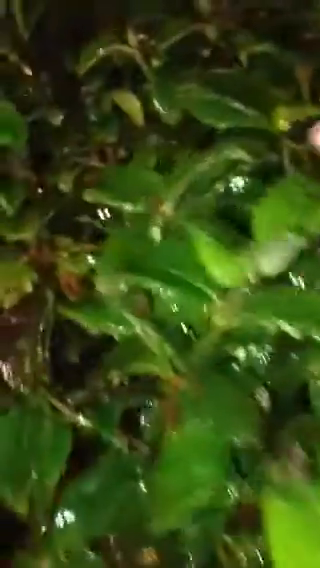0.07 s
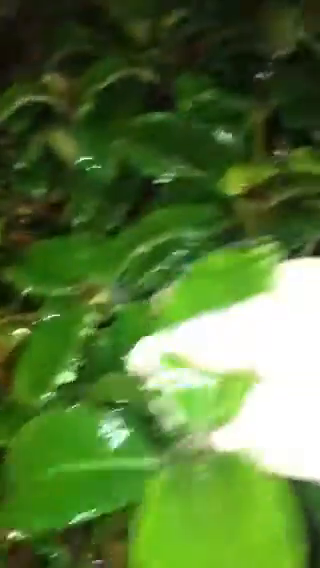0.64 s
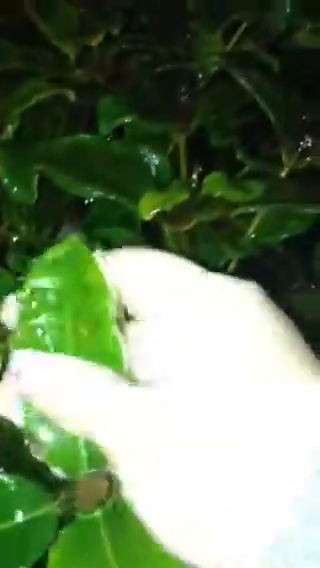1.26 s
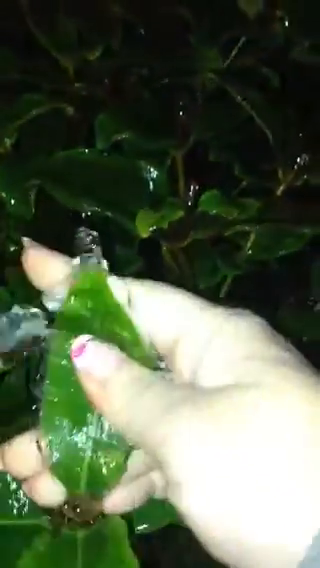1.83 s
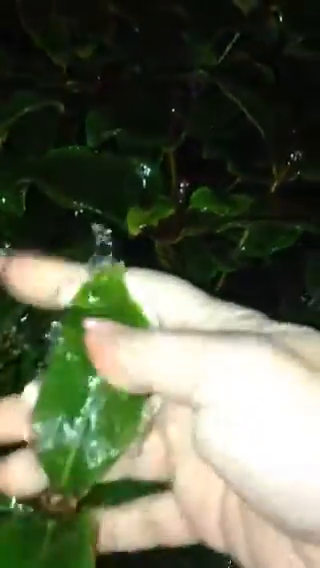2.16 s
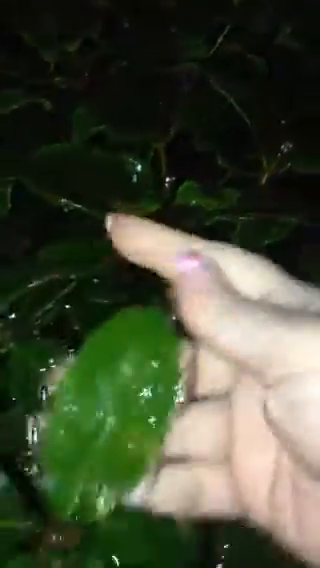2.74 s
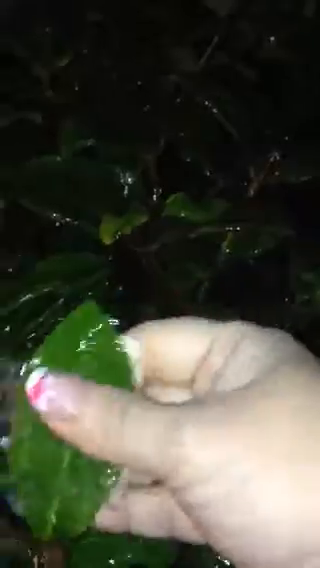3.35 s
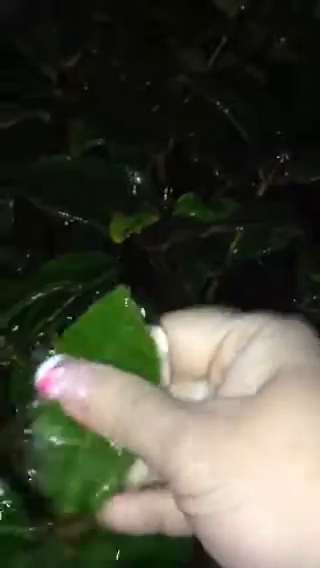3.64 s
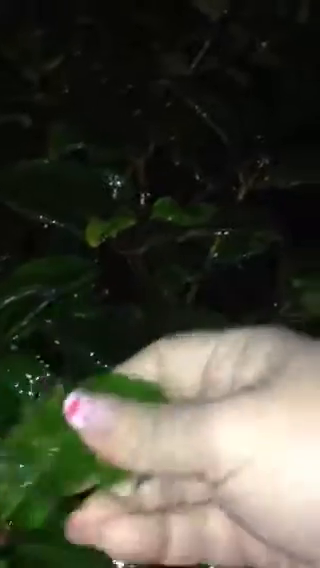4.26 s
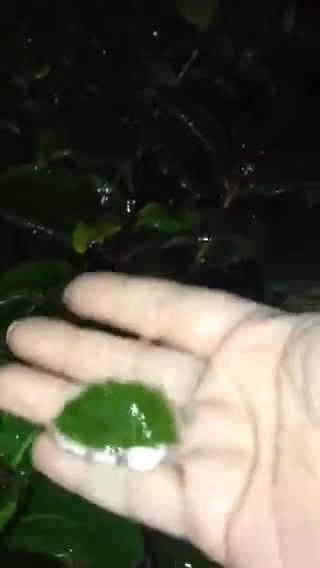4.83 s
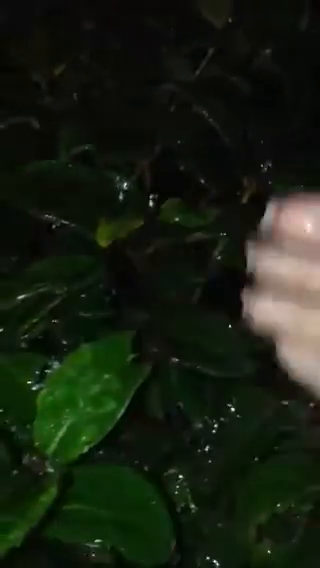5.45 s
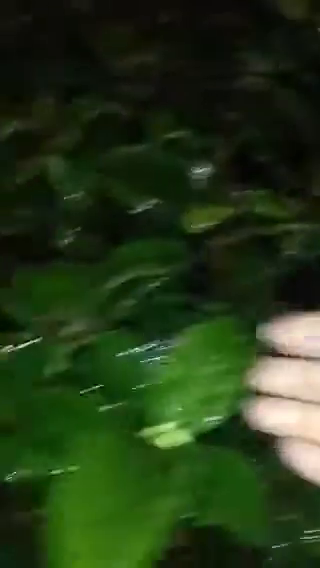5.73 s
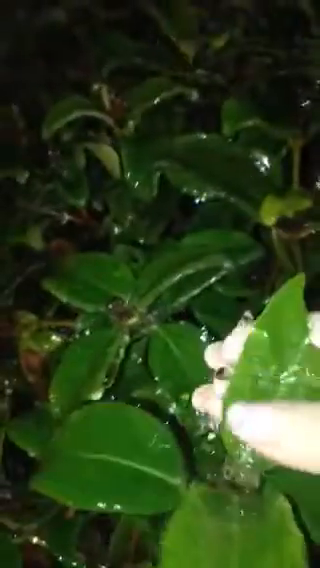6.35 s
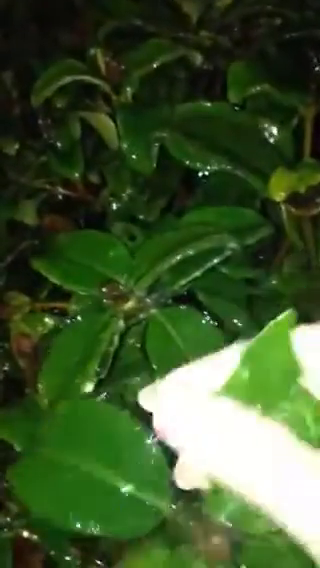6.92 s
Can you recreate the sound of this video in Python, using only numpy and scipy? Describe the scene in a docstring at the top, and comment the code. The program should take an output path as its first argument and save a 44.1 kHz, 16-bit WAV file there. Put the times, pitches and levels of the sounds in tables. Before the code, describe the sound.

Outdoors at a bush at night, a hand bends ice-coated leaves close to the microphone. The glaze snaps in tiny, sharp cracks throughout, crumbling and scraping as it slides over a leaf. Just overhead, water drips evenly on an umbrella with a few heavier drops, and about halfway a patter of small drops joins in. Brief gusts rumble on the microphone near the start and around the middle.

```python
"""Ice on leaves at night

Outdoors at a bush, phone microphone close in. A hand bends ice-coated leaves and slides the shell off
one: the glaze snaps in tiny ringing cracks, crumbles and scrapes over the leaf. Just overhead, drops
tap on taut umbrella fabric, singly and then in a patter. A few gusts buffet the microphone."""
import sys
import numpy as np
from scipy import signal
from scipy.fft import rfft, irfft
from scipy.io import wavfile
from scipy.ndimage import uniform_filter1d

SR = 44100
rng = np.random.default_rng(int(sys.argv[2]) if len(sys.argv) > 2 else 0)


def generate_wav(signal):
    """Clip the signal to [-1, 1] and save it as 16-bit WAV at the path in sys.argv[1]."""
    frames = np.transpose(np.atleast_2d(signal))
    scaled = np.clip(frames, -1, 1) * 32767
    pcm = np.round(scaled).astype(np.int16)
    wavfile.write(sys.argv[1], SR, pcm)


N = 312757
TIME = np.arange(N) / SR
TOP_HZ = 15500
BANDS_HZ = np.geomspace(200, 16000, 40)

# snaps of the glaze, close in: (time [s], level over 1 ms [dB], centre [Hz], spread [octaves],
# delay of a second snap or 0 for none [s], force of the crumbling around it [dB])
CRACKS = [(0.103, -31.5, 3870, 0.48, 0.0019, -55), (0.1724, -16, 6560, 0.22, 0, -37),
          (0.249, -15, 6030, .63, 0, -60), (0.6094, -30.5, 6940, 0.5, 0.0012, -55),
          (0.653, -24, 6300, .5, 0.018, -43), (0.7496, -27.5, 5180, 0.84, 0.007, -62),
          (1.1424, -16.5, 7120, 0.63, 0.0017, -42), (1.1995, -26, 7000, .54, 0.0086, -45),
          (1.274, -25, 7200, 0.52, 0.003, -54), (1.2822, -18, 6760, 0.71, 0.0036, -49),
          (1.3127, -17.5, 6300, 0.9, 0, -63), (1.5388, -19, 7800, 1.13, 0, -43),
          (1.7836, -23.5, 9040, 0.51, .0144, -49), (1.8783, -23, 8200, 0.53, 0.0081, -60),
          (1.893, -23.5, 7600, 0.58, 0, -63), (1.941, -27.5, 7140, 0.23, 0, -70),
          (2.029, -23, 6800, 0.81, 0.0056, -52), (2.095, -21, 7250, 0.26, 0.0021, -31),
          (2.243, -20, 4000, 0.7, 0, -51), (2.2542, -22, 5360, 0.49, 0.0011, -40.5),
          (2.3867, -28, 5560, 0.55, 0.0053, -41), (2.53, -22, 8200, 0.43, 0.0044, -36),
          (2.613, -29, 5570, 1.14, 0.0015, -47), (2.66, -24.5, 7000, 1.08, 0.0011, -34),
          (2.696, -26, 4470, 0.88, 0.003, -41), (2.739, -20, 3860, 0.65, .004, -44),
          (2.848, -22, 4250, 0.69, 0.0026, -47), (2.889, -20, 6400, 1.17, 0.0047, -34),
          (2.9072, -23, 5760, .2, 0.0005, -66), (2.9493, -29, 7240, 0.79, 0.004, -52),
          (2.9887, -26.5, 4120, 0.46, 0.014, -43), (3.0896, -24.5, 4760, 0.74, 0.018, -52),
          (3.131, -22, 5600, 1, 0.0067, -34), (3.2303, -25.5, 2900, 1, 0.0028, -36),
          (3.3183, -15.5, 9240, 0.25, 0.0077, -37), (3.4964, -24.5, 3200, 1, 0.0042, -49),
          (3.7738, -21.5, 6000, 0.24, 0.0026, -52), (3.892, -27.5, 7260, 0.57, 0.0041, -37.5),
          (3.945, -27, 3930, 0.23, 0.00082, -60), (3.96, -26.5, 7260, 0.82, .021, -44),
          (4.064, -23, 6050, 0.64, 0.00061, -33), (4.0992, -14.5, 3930, 0.7, 0.014, -59),
          (4.1178, -23, 3220, 0.32, 0.0073, -42.5), (4.1339, -22.5, 4250, .7, 0, -35.5),
          (4.203, -25.5, 3400, 0.38, 0, -52), (4.246, -29.5, 9100, 0.67, .006, -57),
          (4.4044, -21.5, 2480, 0.53, 0.0056, -58), (4.4085, -22.5, 7520, 0.66, .007, -36),
          (4.486, -32, 6800, .65, 0.0051, -47), (4.61, -25, 6950, 1.06, 0.0014, -34),
          (4.7589, -31, 7700, 0.42, 0.005, -54), (4.863, -26, 5000, 0.88, .005, -53),
          (5.092, -26.5, 10800, 0.32, 0.00097, -46.5), (5.2095, -31, 10700, 0.15, 0.0011, -45.5),
          (5.282, -23.5, 5440, 0.77, 0.0014, -37), (5.3619, -11, 5860, 0.43, 0, -50),
          (5.3698, -15.5, 6100, 0.49, 0, -57), (5.382, -19, 6300, 0.77, 0.004, -58),
          (5.479, -22, 6600, 0.75, 0, -58), (5.5764, -24, 2100, 0.34, 0, -58),
          (5.6076, -19, 4550, .7, 0.00057, -55), (5.7341, -13, 3430, 0.72, 0.0088, -36),
          (5.7783, -21.5, 3200, 0.7, 0.0046, -54), (5.818, -26.5, 4530, 0.94, 0.0033, -64),
          (5.896, -32.5, 4530, 0.95, 0.0033, -48), (6.0705, -27.5, 3260, 0.66, 0.0055, -53),
          (6.13, -21.5, 6780, 1.04, 0.0002, -37), (6.5009, -19, 7240, 0.63, 0.0034, -45),
          (6.8467, -16, 7140, 0.5, 0.003, -36.5), (7.0478, -23, 9500, 0.5, 0.0065, -47)]
# shiver of the stiff leaf after a snap: (frequency [Hz], relative density [dB])
LEAF_SPECTRUM = [(500, -33), (1400, 2.5), (2200, -10), (2900, 11), (3800, 6.5), (4700, 12), (6200, -36),
                 (8500, 15.5), (15000, -16.5)]
# fingers push ice along the leaf:
# (time [s], length [s], force [dB], fade over the length [dB], force of crunch relative to fizz [dB])
STROKES = [(0.164, 0.15, -32, 18, -19), (1.31, 0.17, -40, 8.5, -35), (1.504, 0.1, -40.5, -0.5, -7),
           (1.708, 0.046, -48.5, -4, -17), (1.765, 0.058, -35, 21, -9), (1.86, 0.17, -54, -11, -36),
           (1.993, 0.13, -41.5, -2.5, -18), (2.136, 0.077, -47.5, -6.5, -17), (2.73, 0.081, -41.5, 8, -1),
           (3.068, 0.053, -38.5, 30, 7), (3.308, 0.023, -43, -6.5, -7.5), (3.423, 0.029, -57.5, 12, 18),
           (3.663, 0.066, -32.5, 35, -24), (3.734, 0.069, -49.5, -5.5, -28), (3.934, 0.063, -54, -14, -9),
           (4.224, 0.13, -40.5, 8, -17), (4.359, 0.17, -39, 12.5, -3.5), (5.01, 0.075, -51, 14, 2),
           (5.8, 0.064, -40.5, 23, 5), (6.199, 0.15, -44.5, 9, -20), (6.584, 0.067, -44, 4, -17),
           (6.851, 0.092, -51, -2, -23), (6.999, 0.04, -33.5, 28, -27)]
# ice sliding on the leaf: (frequency [Hz], relative density [dB])
SLIDE_SPECTRUM = [(1200, -28), (2500, -4), (4000, 4), (6000, 3), (9000, 2), (12000, 1.5), (15500, -5)]
# loose crumbs and rustling leaves: (time [s], level [dB])
RUSTLE = [(0, -59), (.5, -51.5), (.9, -64.5), (1.3, -58), (1.85, -59), (2.2, -64), (2.5, -55.5), (2.7, -46),
          (3.5, -52.5), (4.3, -46.5), (4.8, -57.5), (5.6, -58), (6.15, -50), (6.7, -55), (7.09, -51.5)]

# modes of the fabric overhead: (frequency [Hz], t60 [s], relative level [dB])
FABRIC_MODES = [(217, 0.095, -27), (306, 0.056, -6.5), (359.6, 0.053, 2.5), (424, 0.082, -9),
                (521, 0.022, 1.5), (648, 0.044, -1), (786, 0.022, -3.5), (976, 0.015, -2),
                (1140, 0.065, -26)]
# the fabric booms more as the phone moves under it: (time [s], gain of its deep modes [dB])
FABRIC_BOOM = [(0, 2.5), (3.3, -14), (4.2, 2.5), (5.5, 5), (6.0, 53), (7.09, 43)]
# a drop's slap on the fabric: (frequency [Hz], relative density [dB])
SLAP_SPECTRUM = [(300, -11.5), (700, 2), (1200, 0.5), (1900, -1), (2900, -3), (5000, -12), (12000, -20.5)]
# the steady drip's slightly wavering pace: (time [s], gap between drops [s])
DRIP_PACE = [(0, .2242), (1.5, .2242), (1.7, .221), (3.2, .221), (3.5, .228), (4.9, .216), (5.4, .228),
             (7, .222)]
# size of the drip's drops: (time [s], ring level over 10 ms [dB])
DRIP_SIZE = [(0, -39.5), (.6, -36), (1.3, -40.5), (1.9, -42), (2.12, -37.5), (2.33, -46), (2.56, -37),
             (7.09, -42)]
# stray heavy drops: (time [s], relative level [dB], slap relative to the fabric's ring [dB])
HEAVY_DROPS = [(0.188, -40.5, -4), (0.391, -37.5, -4), (0.464, -43.5, -3), (0.504, -37.5, -8.5),
               (0.532, -41, -7), (0.645, -44, -4.5), (1.956, -43, 2.5), (2.488, -46, -7),
               (2.726, -41.5, -10), (2.816, -39, -8), (3.152, -39, -12), (3.27, -36, -1),
               (3.388, -37.5, -13), (3.587, -38.5, -7), (3.73, -36, -5), (4.211, -35, -8), (4.389, -34, -8),
               (4.637, -36, -9), (5.429, -46, -12), (6.01, -34.5, -4.5), (6.211, -37, -6),
               (6.25, -33.5, -1.5), (6.437, -35.5, -9), (6.674, -35, -32)]
# the patter of small drops swells halfway: (time [s], relative level [dB])
PATTER = [(0, -59), (0.6, -54), (1.0, -66), (2.3, -61.5), (3.3, -48.5), (4.0, -45.5), (6.0, -44),
          (7.09, -45.5)]

# gusts on the microphone: (time [s], length [s], relative level [dB])
GUSTS = [(0.157, 0.13, -46), (0.53, 0.068, -36.5), (0.637, 0.054, -33), (1.056, 0.09, -52.5),
         (2.801, 0.19, -38), (3.148, 0.24, -39)]
# eddies at the microphone port: (frequency [Hz], relative density [dB])
EDDY_SPECTRUM = [(20, -36), (45, -3), (70, 6.5), (130, 3), (200, -7.5), (350, -37), (800, -26), (3000, -47)]
# hollow knocks within a gust: (frequency [Hz], relative density [dB])
BUFFET_SPECTRUM = [(100, -12), (220, 3.5), (330, 1), (500, -8.5), (1000, -27), (3000, -78)]
# night air, far off: (frequency [Hz], relative density [dB])
NIGHT_SPECTRUM = [(20, -43), (60, 5.5), (110, -5), (200, -3.5), (400, -3), (700, -4), (1500, -10.5),
                  (4000, -9.5), (15000, -16.5)]
# faint distant hum: (frequency [Hz], peak level [dB])
HUM = [(216.6, -67), (109, -73.5)]


def snap(hz, octaves, fall_s=0.00084, ring_s=0.0019, ring_db=-4, leaf_s=0.0032, leaf_db=-12):
    """One fracture: a burst that dies in a millisecond, a ringing flake of ice and the leaf's shiver."""
    t = TIME[:1200]
    noise = rng.standard_normal((2, len(t)))
    bell = np.exp(-(np.log2(BANDS_HZ / hz) / octaves) ** 2 / 2) * hz / BANDS_HZ
    sizzle = undb(-32) ** 2 * (1 + (BANDS_HZ / 3500) ** 2)
    # the fracture runs at full strength for a moment before it dies
    burst = np.tanh(2 * noise[0]) * np.exp(-(t / fall_s) ** 2 / 2)
    crack = colour(burst, rippled(10 * np.log10(bell + sizzle)), size=512)
    # the flake's strongest mode lies at the centre, weaker ones scatter around it
    order = np.arange(3)[:, None]
    offsets = octaves * np.sign(order) * rng.uniform(-0.95, 1, (3, 1))
    modes_hz = np.minimum(hz * 2 ** offsets, TOP_HZ)
    ring = (np.sin(2 * np.pi * modes_hz * t) / np.sqrt(1 + order)).sum(0) * np.exp(-t / ring_s)
    leaf = colour(noise[1] * np.exp(-t / leaf_s), rippled(outline(LEAF_SPECTRUM)), size=512)
    return packed(unit(crack) + undb(ring_db) * unit(ring) + undb(leaf_db) * unit(leaf), seconds=0.001)


def ice_cracks(second_db=-1.5):
    """Close to the microphone the glaze breaks as the leaf bends; often the fracture jumps once more."""
    out = np.zeros(N)
    for s, db, hz, octaves, delay, _ in CRACKS:
        first, second = snap(hz, octaves), snap(hz, octaves)
        add(out, s, undb(db) * first)
        if delay > 0:
            add(out, s + delay, undb(db + second_db) * second)
    return out


def sliding_ice(fizz_db=-2.5, splinter_db=-4.5, crunch_db=0.5, slip_db=2.5, slip_hz=110):
    """Under the fingers ice fizzes over the leaf and splinters, larger pieces crunch, crumbs tick."""
    # the ice catches and slips, so the force is never even
    fine, coarse = rubbing_force() * undb(slip_db * wander(slip_hz))
    splinters = chips(centre_hz=9030, range_octaves=0.57, spread_db=5, most_db=14, count=330)
    crunch = chips(centre_hz=2680, range_octaves=0.616, spread_db=3.5, most_db=14, count=3600)
    crumbs = chips(centre_hz=3745, range_octaves=1.52, spread_db=6, most_db=13.5, count=1500)
    scrape = undb(fizz_db) * fizz() + undb(splinter_db) * splinters
    return fine * scrape + undb(crunch_db) * coarse * crunch + undb(curve(RUSTLE)) * crumbs


def rubbing_force(grip_s=0.0025, release_s=0.0056, lead_s=0.007, crumble_s=0.028, thick_ice_hz=3330):
    """Force behind the fine fizz and the coarse crunch: finger strokes, and crumbling at each snap."""
    t = TIME[:SR // 2]
    pushes = []
    for s, length, db, fade_db, coarse_db in STROKES:
        force = undb(db - fade_db * np.minimum(t / length, 1)) * swell(grip_s, length, release_s)
        pushes.append((s, force, coarse_db))
    for s, _, hz, _, _, db in CRACKS:
        force = undb(db) * swell(lead_s, lead_s, crumble_s)
        coarse_db = -12.5 * np.log2(hz / thick_ice_hz)  # lower snaps are thicker ice and crunch more
        pushes.append((s - lead_s, force, coarse_db))  # the ice starts to give before it snaps
    fine, coarse = np.zeros((2, N))
    for s, force, coarse_db in pushes:
        add(fine, s, force)
        add(coarse, s, force * undb(coarse_db))
    return np.array([fine, coarse])


def chips(centre_hz, range_octaves, spread_db, most_db, count):
    """A shower of tiny snaps from flakes of many sizes, each with its own pitch; rms 1."""
    flakes = [snap(centre_hz * 2 ** (range_octaves * u), octaves=0.35) for u in np.linspace(-1, 1, 36)]
    out = np.zeros(N)
    for k, (when, flake, luck) in enumerate(rng.random((count, 3))):
        db = min(-spread_db * np.log(1 - luck), most_db)
        add(out, TIME[-1] * (k + 2 * when) / count, undb(db) * flakes[int(flake * len(flakes))])
    return unit(out)


def fizz(friction_db=-2, grain_s=0.00017):
    """Countless microscopic fractures over a smooth friction hiss; rms 1."""
    pulses = grains(per_s=1100, spread_db=8, most_db=13)
    decay = np.exp(-2 * TIME[:256] / grain_s)
    energy = np.maximum(signal.oaconvolve(pulses ** 2, decay)[:N], 0)
    fractures = unit(np.sqrt(energy) * rng.standard_normal(N))
    friction = undb(friction_db) * rng.standard_normal(N)
    return unit(colour(fractures + friction, SLIDE_SPECTRUM))


def near_echo(x, wet_db=-19, t60=0.1, gap_s=0.002):
    """Hand, foliage and fabric scatter a brief faint echo back to the microphone."""
    t = TIME[:6000]
    echo = rng.standard_normal(len(t)) * undb(-60 * t / t60) * (t > gap_s)
    return x + undb(wet_db) * signal.oaconvolve(x, packed(echo, seconds=1 / SR))[:N]


def fabric_ring(boom_db, scatter_db=2, detune=0.044, boom_hz=305, boom_octaves=0.19):
    """The taut fabric's modes, weighted differently wherever a drop lands."""
    t = TIME[:3000]
    hz, t60, db = np.array(FABRIC_MODES).T[:, :, None]
    chance = rng.standard_normal((2, len(hz), 1))
    boom_share = np.exp(-(np.log2(hz / boom_hz) / boom_octaves) ** 2)
    db = db + scatter_db * chance[0] + boom_db * boom_share
    modes = undb(db - 60 * t / t60) * np.cos(2 * np.pi * hz * (1 + detune * chance[1]) * t)
    # the soft drop pushes for a fraction of a millisecond, which dulls the ring
    ring = signal.sosfilt(signal.butter(2, 1300, fs=SR, output="sos"), modes.sum(0))
    return packed(ring, seconds=0.01)


def drop(s, slap_db, splash_s=0.0041):
    """A drop slaps the fabric above the microphone, splashes and leaves it ringing."""
    ring = fabric_ring(curve(FABRIC_BOOM, s))
    splash = 0.25 * rng.standard_normal(len(ring)) * np.exp(-TIME[:len(ring)] / splash_s)
    splash[0] += 2  # the impact itself
    slap = colour(splash, rippled(outline(SLAP_SPECTRUM)), size=512)
    return ring + undb(slap_db) * packed(slap, seconds=0.01)


def drip(start_s=0.104, scatter_db=0.2):
    """Water gathers at one point and falls on the fabric at a nearly even pace."""
    out, s = np.zeros(N), start_s
    while s < TIME[-1]:
        db = curve(DRIP_SIZE, s) + scatter_db * rng.standard_normal()
        add(out, s, undb(db) * drop(s, slap_db=-4))
        s += curve(DRIP_PACE, s)
    return out


def rain(heavy_db=-1, small_db=0.5, scatter_db=5, patter_start_s=3.3, count=170):
    """A few heavy drops stray onto the fabric; halfway a patter of small ones begins."""
    out = np.zeros(N)
    for s, db, slap_db in HEAVY_DROPS:
        add(out, s, undb(db + heavy_db) * drop(s, slap_db))
    for k, (when, size) in enumerate(rng.random((count, 2))):
        s = patter_start_s + (TIME[-1] - patter_start_s) * (k + 2 * when) / count
        db = curve(PATTER, s) + small_db + scatter_db * (2 * size - 1)
        add(out, s, undb(db) * drop(s, slap_db=-5))
    return out


def drizzle(gain_db=-8):
    """The finest drops merge and keep the fabric softly droning overhead."""
    drone = signal.oaconvolve(rng.standard_normal(N), fabric_ring(boom_db=12))[:N]
    return unit(drone) * undb(curve(PATTER) + gain_db)


def wind(flutter_db=1.96, flutter_hz=25, gain_db=-1, steady_s=0.061, buffet_db=-45, calm_db=-67):
    """Eddies tumble over the microphone port; the strongest gusts break up into hollow knocks."""
    gust = np.full(N, undb(calm_db))
    for s, length, db in GUSTS:
        add(gust, s, undb(db) * swell(attack_s=0.027, hold_s=length, release_s=0.037))
    eddies = colour(rng.standard_normal(N), EDDY_SPECTRUM, size=8192)
    eddies /= np.sqrt(uniform_filter1d(eddies ** 2, int(steady_s * SR)) + 1e-12)  # even out the level
    knocks = unit(colour(grains(per_s=120, spread_db=3, most_db=10), BUFFET_SPECTRUM, size=2048))
    rumble = eddies * gust * undb(gain_db + flutter_db * wander(flutter_hz))
    return rumble + knocks * undb(buffet_db) * (gust / gust.max()) ** 1.75


def night(air_db=-58.5, waver_db=1):
    """Far behind the bush: rumble, soft hiss and a faint hum."""
    air = unit(colour(rng.standard_normal(N), NIGHT_SPECTRUM, size=8192))
    hum = sum(undb(db) * np.sin(2 * np.pi * hz * TIME + wander(10)) for hz, db in HUM)
    return air * undb(air_db + waver_db * wander(6.4)) + hum


def undb(db):
    """Decibels to gain."""
    return 10 ** (np.asarray(db) / 20)


def curve(table, s=TIME):
    """Read a (time, value) table at time s along straight lines."""
    return np.interp(s, *np.transpose(table))


def unit(x):
    """Scale to rms 1."""
    return x / np.sqrt(np.mean(x ** 2))


def packed(x, seconds):
    """Scale a burst to the energy of rms 1 lasting so long."""
    return x * np.sqrt(seconds * SR / np.sum(x ** 2))


def add(out, s, sound):
    """Mix a short sound in at time s."""
    i = max(int(s * SR), 0)
    out[i:i + len(sound)] += sound[:max(N - i, 0)]


def colour(x, points, size=1024):
    """Minimum-phase filter with the outline (frequency [Hz], gain [dB])."""
    hz, db = np.transpose(points)
    grid = np.maximum(np.fft.rfftfreq(size, 1 / SR), 1)
    gain = undb(np.interp(np.log(grid), np.log(hz), db))
    cepstrum = irfft(np.log(gain))
    cepstrum[1:size // 2] *= 2
    cepstrum[size // 2 + 1:] = 0
    return signal.fftconvolve(x, irfft(np.exp(rfft(cepstrum))))[:len(x)]


def outline(points):
    """Read (frequency [Hz], level [dB]) points at BANDS_HZ."""
    hz, db = np.transpose(points)
    return np.interp(np.log(BANDS_HZ), np.log(hz), db)


def rippled(db, ripple_db=3.8):
    """Every piece of ice and spot of fabric adds its own peaks and dips to an outline."""
    return np.c_[BANDS_HZ, db + ripple_db * rng.standard_normal(len(BANDS_HZ))]


def wander(rate_hz):
    """Random drift through rate_hz points a second; rms 1."""
    knots = rng.standard_normal(4096)
    return unit(np.interp(TIME * rate_hz, np.arange(len(knots)), knots))


def grains(per_s, spread_db, most_db):
    """Random impulses of uneven size; rms 1."""
    sizes = undb(np.minimum(spread_db * rng.exponential(size=N), most_db))
    return unit((rng.random(N) < per_s / SR) * sizes * rng.choice([-1, 1], N))


def swell(attack_s, hold_s, release_s):
    """Envelope that rises, holds until hold_s and dies away."""
    t = TIME[:SR // 2]
    return np.minimum(t / attack_s, 1) * np.exp(-np.maximum(t - hold_s, 0) / release_s)


def scene():
    """One microphone: ice close in, rain just overhead, open night air beyond."""
    ice = near_echo(ice_cracks() + sliding_ice())
    return (ice + drip() + rain() + drizzle() + wind() + night())[None]


def record(dry):
    """The phone cuts the top of the treble."""
    return signal.sosfilt(signal.ellip(10, 0.2, 70, TOP_HZ, fs=SR, output="sos"), dry)


dry = scene()
out = record(dry)
generate_wav(out)
```